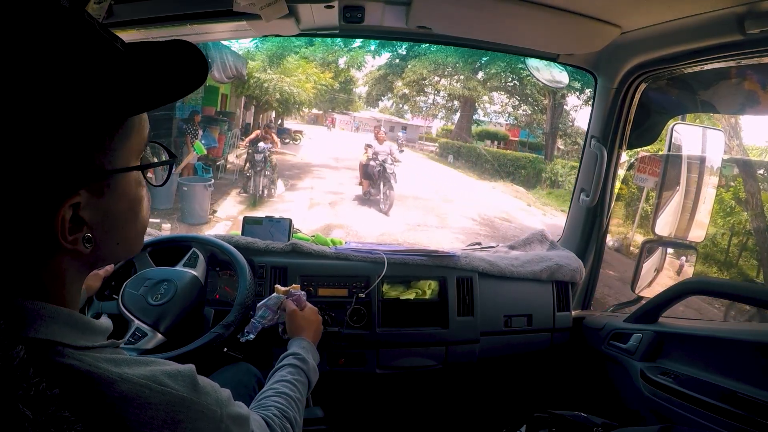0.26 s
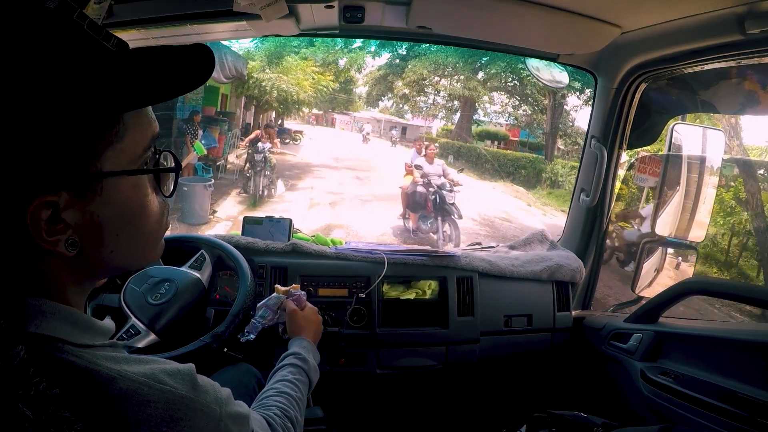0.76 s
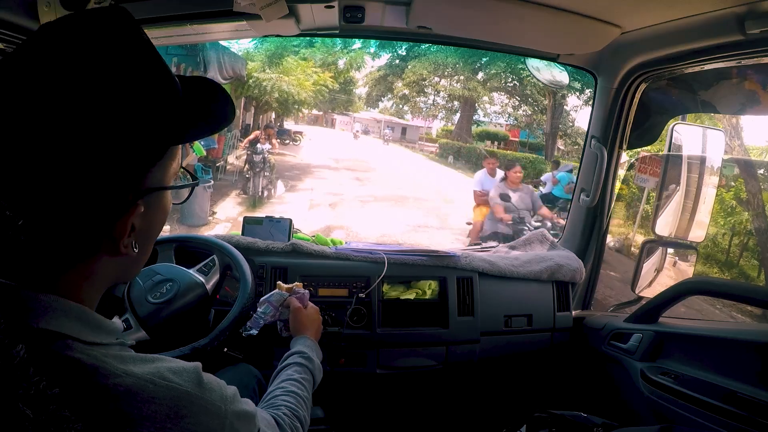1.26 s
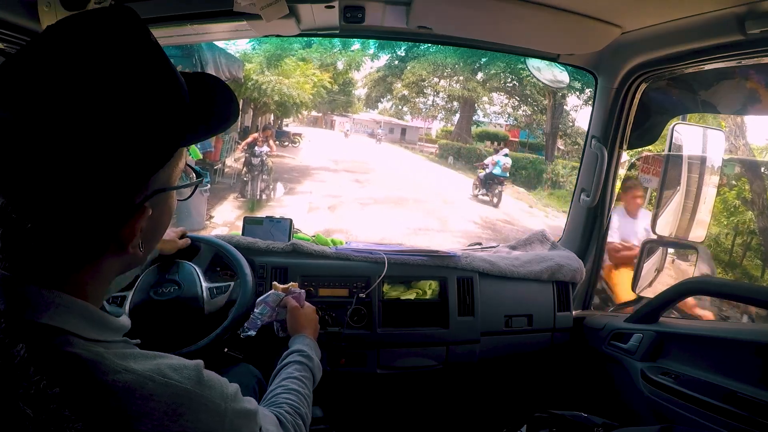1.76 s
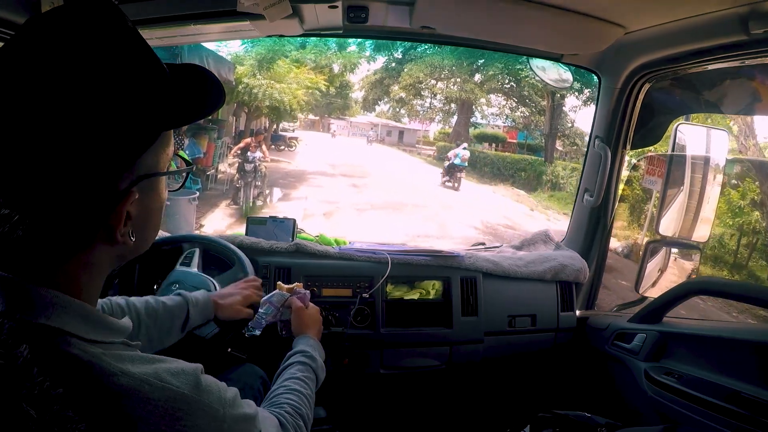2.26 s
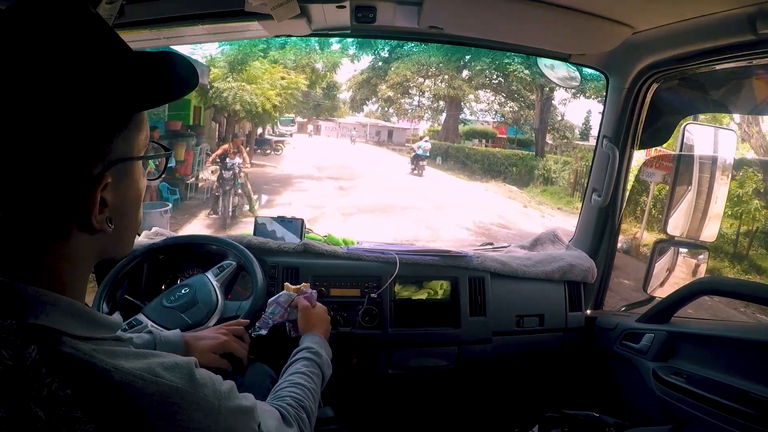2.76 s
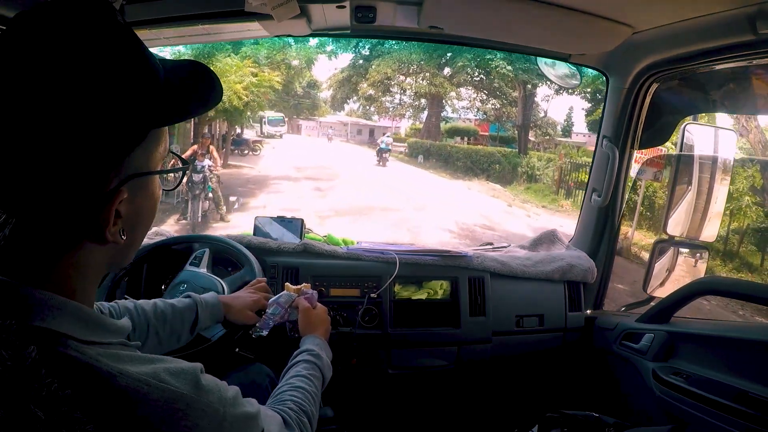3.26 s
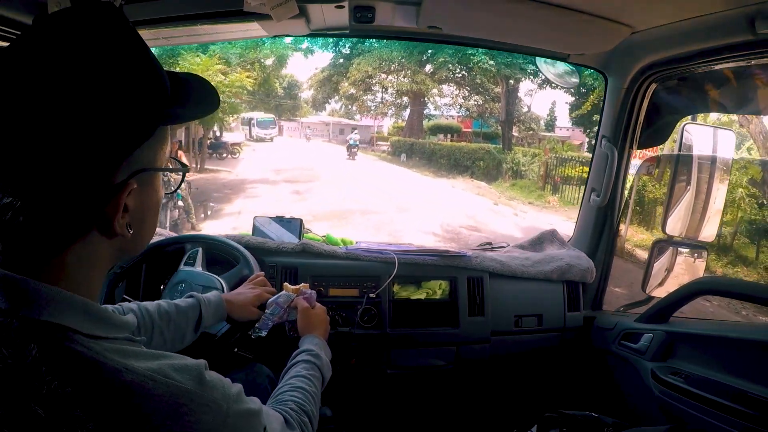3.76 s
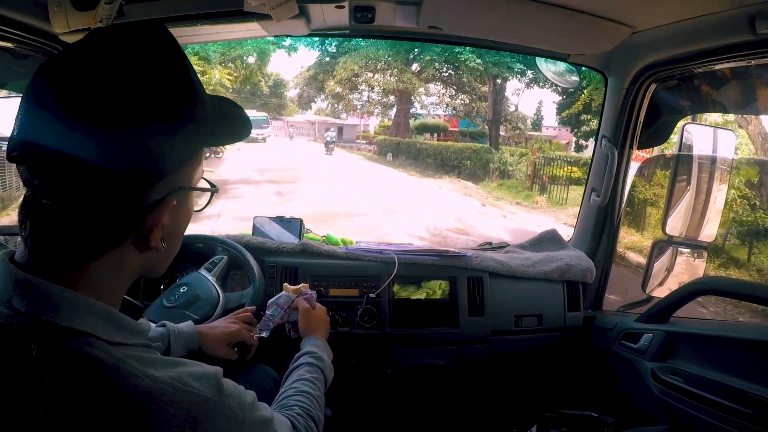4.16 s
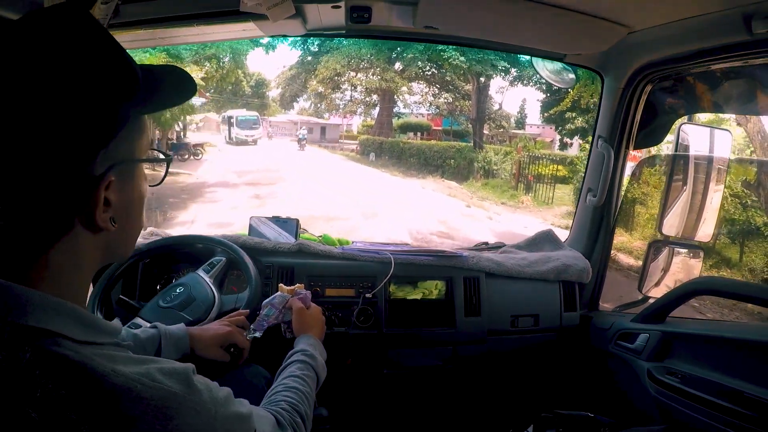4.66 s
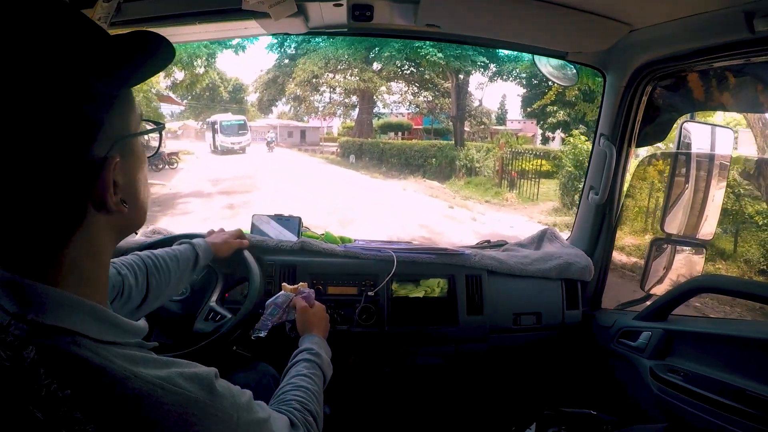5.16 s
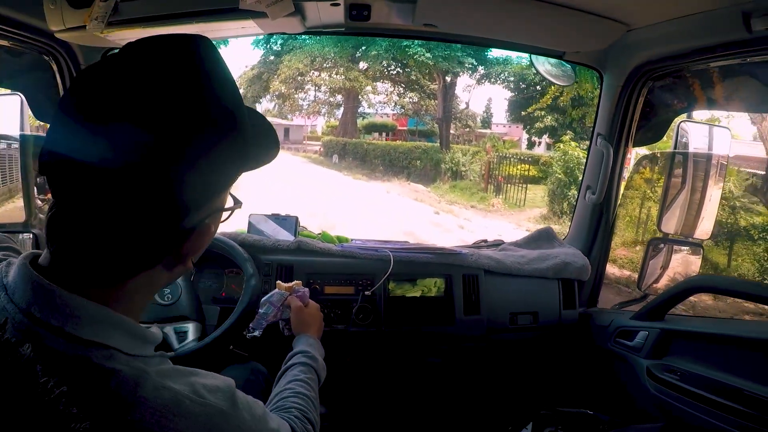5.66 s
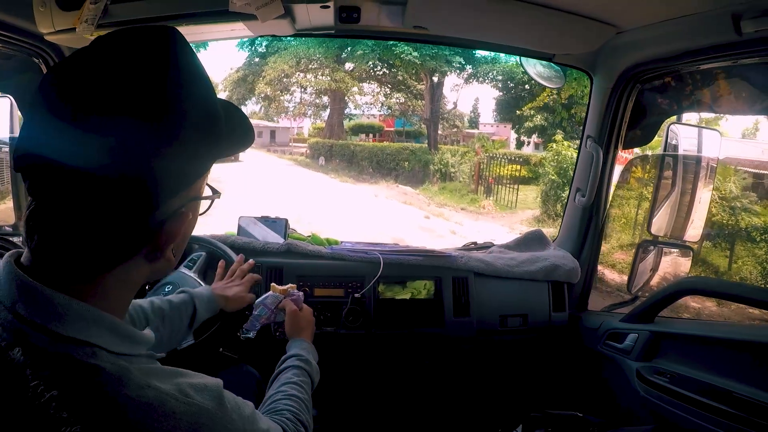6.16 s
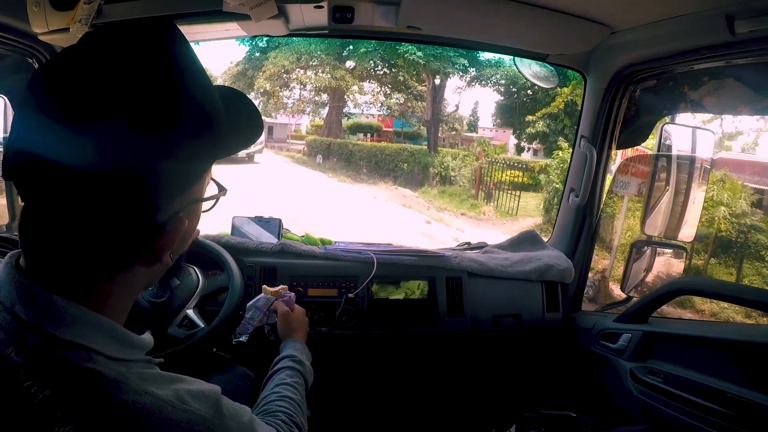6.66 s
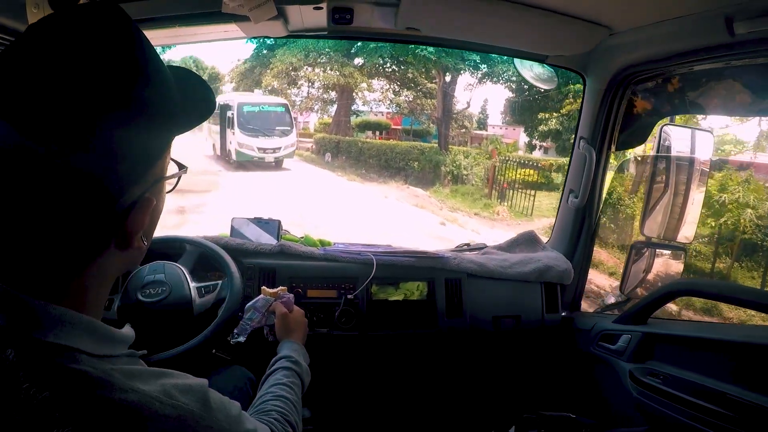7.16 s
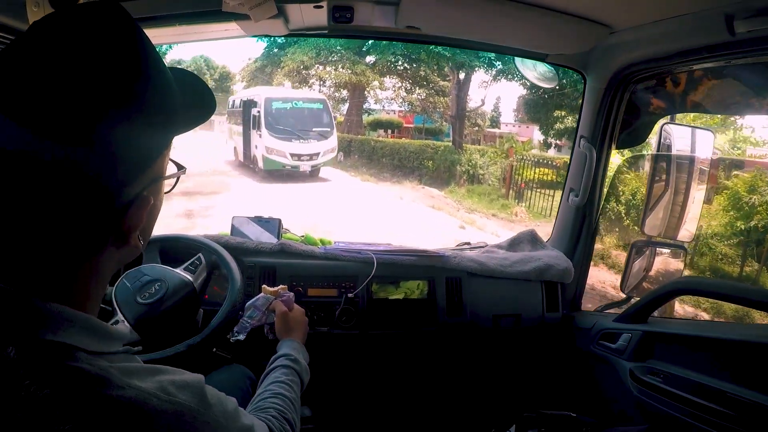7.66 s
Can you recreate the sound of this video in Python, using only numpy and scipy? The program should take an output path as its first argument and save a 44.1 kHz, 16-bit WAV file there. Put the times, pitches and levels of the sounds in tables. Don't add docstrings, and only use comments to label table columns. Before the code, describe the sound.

Inside a truck cab, a small diesel near idle booms and knocks, swelling with each pull, over deep body rumble, soft hiss and loose trim ticks.

```python
import sys
import numpy as np
from scipy import signal
from scipy.fft import rfft, irfft, next_fast_len
from scipy.io import wavfile

SR = 44100
rng = np.random.default_rng(int(sys.argv[2]) if len(sys.argv) > 2 else 0)


def master_out(mix):
    frames = np.transpose(np.atleast_2d(mix))
    ceiling = np.clip(frames, -1, 1)
    pcm = np.round(ceiling * 32767).astype(np.int16)
    wavfile.write(sys.argv[1], SR, pcm)


def convert_level_to_amplitude(level_db):
    exponent = np.asarray(level_db, float) / 20
    return 10 ** exponent


N = 349272


def rms_one(x):
    return x / np.sqrt(np.mean(x ** 2) + 1e-20)


def in_time(rows):
    seconds, *columns = np.transpose(rows)
    return [np.interp(np.arange(N) / SR, seconds, column) for column in columns]


def at_hz(points, hz):
    point_hz, point_db = np.transpose(points)
    return np.interp(np.log(hz), np.log(point_hz), point_db, left=-150, right=-150)


def drift(rate):
    r = np.exp(-80 * np.pi * rate / SR)
    white = rng.standard_normal(N // 40 + 2002)
    slow = signal.lfilter([1], [1, -2 * r, r * r], white)[2000:]
    return np.interp(np.arange(N) / 40, np.arange(len(slow)), rms_one(slow))


def ring(clicks, hz, t60):
    r = convert_level_to_amplitude(-60 / (t60 * SR))
    w = 2 * np.pi * hz / SR
    return signal.lfilter([0, np.sin(w)], [1, -2 * r * np.cos(w), r * r], clicks + 1e-18)


def coloured(white, spectrum):
    size = next_fast_len(N)
    hz = np.arange(1, size // 2 + 2) * SR / size
    return rms_one(irfft(rfft(white, size) * convert_level_to_amplitude(at_hz(spectrum, hz)), size)[:N])


def ports(alike, opposite):
    return np.array([alike + opposite, alike - opposite])


# frequency in Hz, tie from 0 to 1,
# phase lead in radians, opposed level of the engine orders in dB.
PORT_LINK = [(25, .9, -2.3, -11.5), (60, .8, -2.3, -11.5), (90, .65, -2.3, -1), (125, .6, -4.1, -6),
             (190, .4, -5.2, -8), (250, .7, -3.5, -6), (320, .15, -3.0, -6), (420, .5, -3.1, -6),
             (660, .55, -3.3, -3), (900, .4, -5.5, 0), (1250, .7, -6.8, 0), (1600, .6, -5.7, 0),
             (2000, .45, -6.5, 0), (2500, .1, -7.5, 0), (5000, .1, -7.8, 0), (9000, .35, -9.4, 0)]


def port_link(hz, column):
    table = np.array(PORT_LINK)
    return np.interp(np.log(hz), np.log(table[:, 0]), table[:, column])


def noise_bed(level_db, alike, opposite, opposite_db, flutter_db, rate):
    a, b = rng.standard_normal((2, N))
    hz = np.arange(1, N // 2 + 2) * SR / N
    tie = np.clip(port_link(hz, column=1), 0, 1)
    turned = tie * np.exp(1j * port_link(hz, column=2)) * rfft(a)
    follower = irfft(turned + np.sqrt(1 - tie ** 2) * rfft(b), N)
    gain = convert_level_to_amplitude(level_db + flutter_db * drift(rate))
    return gain * ports(coloured(a, alike), convert_level_to_amplitude(opposite_db) * coloured(follower, opposite))


# time in seconds, firings per second.
ENGINE_SPEED = [(0, 25), (.78, 25), (.95, 26.9), (1.15, 25.8), (1.4, 27.3), (2.05, 26.2), (2.3, 27),
                (2.55, 25.7), (3.8, 25.2), (4, 28.8), (4.5, 29.6), (4.8, 27.9), (5.25, 27.7), (5.5, 26.7),
                (6.45, 26.6), (6.63, 29.5), (7.7, 26.5), (7.92, 27.9)]


def firing_rate():
    hunting_hz = .15
    return in_time(ENGINE_SPEED)[0] + hunting_hz * drift(2.0)


# time in seconds, load in dB.
ENGINE_LOAD = [(0, -22), (.74, -6), (.92, 5), (1.17, -2.5), (1.35, 4), (2.3, 3), (2.55, 2), (2.82, 2.5),
               (3.02, -7), (3.55, 3), (3.78, -1.5), (4.7, 4), (5.3, -2), (6.35, 0.5), (6.6, 5.5), (6.95, 3),
               (7.5, -5), (7.92, 5.5)]


def engine_load():
    return in_time(ENGINE_LOAD)[0]


LOAD_SHARES = (0.034, 0.97, 0.22, 0.55, 0.12, 0.043)
# frequency in Hz, level in dB.
CAB_BOOM = [(60, -32), (76, -35), (88, -41), (111, -29), (135, -35), (165, -41), (190, -42.5), (228, -47.5),
            (241, -34), (252, -39), (264, -46), (285, -66.5), (330, -72.5)]


def boom(firing, load_db):
    turn, at = 2 * np.pi * np.cumsum(firing) / SR, np.arange(N)
    first_db = -21.5 + LOAD_SHARES[0] * load_db + 2.2 * drift(3.9)
    second_db = -20 + LOAD_SHARES[1] * load_db + 2.6 * drift(5.0)
    own_db = {1: first_db, 2: second_db}
    out = 0
    for order in range(1, 12):
        hz = order * firing[::50]
        cab_db = at_hz(CAB_BOOM, np.clip(hz, 64, 310))
        cab = cab_db, convert_level_to_amplitude(port_link(hz, column=3)), port_link(hz, column=2)
        passed_db, opposed, lead = (np.interp(at, at[::50], column) for column in cab)
        level_db = own_db.get(order, passed_db + LOAD_SHARES[2] * load_db) + 1.5 * drift(3.7)
        angle = order * turn + 0.19 * drift(6.7) + rng.uniform(0, 6.9)
        out = out + np.sqrt(2) * convert_level_to_amplitude(level_db) * ports(np.sin(angle), opposed * np.sin(angle + lead))
    return out


# share of the firing period from 0 to 1, level in dB.
KNOCKS = [
    (.0, -11),
    (0.272, 10.5),
    (0.398, -0.5),
    (0.658, -23),
]
# frequency in Hz, level in dB, t60 in seconds,
# share heard in phase at both ports.
BULKHEAD = [(855, -8, .18, .6), (1226, 4, .26, .3), (1725, -17, .1, .5), (1895, -15, .06, .5),
            (1985, -14, .06, .6), (1040, -8, .05, .3), (1100, -8, .06, .3), (1165, -10, .06, .3),
            (1325, -7, .04, .15), (3360, -20, .04, .9)]


def knock(cycle, load_db):
    knock_db = -46.5 + LOAD_SHARES[3] * load_db + 0.5 * drift(8.1)
    firing_number = cycle.astype(int)
    cylinder_db = np.array([-7.0, -3.0, -13.5, -5.0])
    strength_db = cylinder_db[firing_number % 4] + 0.43 * rng.standard_normal(400)[firing_number]
    gate = sum(convert_level_to_amplitude(db) * np.exp(-((cycle - share) % 1) / 0.13) for share, db in KNOCKS)
    push = gate * convert_level_to_amplitude(strength_db) + 0.26
    out = 0
    for hz, db, t60, share in BULKHEAD:
        repeated = rng.standard_normal(1650)[(cycle % 1 * 1650).astype(int)]
        force = 2.6 * repeated + 0.21 * rng.standard_normal(N)
        mode = convert_level_to_amplitude(db) * rms_one(ring(push * force, hz, t60))
        out = out + ports(np.clip(share, 0, 1) * mode, mode)
    return convert_level_to_amplitude(knock_db - 1.0) * out


# frequency in Hz, level in dB.
GEAR_COVER = [(1080, -16), (1165, -13), (1195, -10), (1226, 0), (1255, -8), (1280, -19), (1340, -8),
              (1420, -18)]


def whine(cycle, load_db):
    whine_db = -46 + LOAD_SHARES[4] * load_db + 0.5 * drift(2.2)
    teeth = 46
    turn = 2 * np.pi * cycle
    tooth_load = np.exp(2.2 * np.cos(turn - 1.9))
    song = np.sin(teeth * turn + .3 * drift(4.0))
    tone = rms_one(tooth_load * song) * convert_level_to_amplitude(1.2 * drift(10.0))
    size = next_fast_len(N)
    hz = np.clip(np.arange(size // 2 + 1) * SR / size, 1081, 1419)
    covered = irfft(rfft(tone, size) * convert_level_to_amplitude(at_hz(GEAR_COVER, hz)), size)[:N]
    tone = convert_level_to_amplitude(whine_db + 13.0) * covered
    return ports(0.26 * tone, tone)


# time in seconds, road roughness in dB, outside noise let in in dB.
STREET = [(0.0, 1.5, 6.5), (0.7, -1.5, 7), (1.2, -0.5, 4), (1.7, -1.5, 3.5), (2.45, 0.5, 3.5),
          (2.9, -2.5, -0.5), (3.7, -1, 1), (4.1, 0.5, 2.5), (4.45, 2, -0.5), (4.8, -2.5, -2),
          (5.6, -0.5, -1), (6.3, -2, 0.5), (6.6, 1.5, 2), (7.35, -2.5, -1.5), (7.7, 0.5, -0.5),
          (7.92, 4.5, 5)]


def street():
    return in_time(STREET)


# frequency in Hz, level in dB per Hz.
RUMBLE = [(8, -58.5), (14, -4), (22, -2), (31, 0.5), (38, 3), (44, -4.5), (58, -3.5), (72, -4), (95, -13.5),
          (135, -15), (170, -11.5), (205, -16.5), (226, -34), (250, -21), (307, -34), (420, -56.5),
          (600, -79)]
RUMBLE_OPPOSED = [(7.1, -38), (12, -9), (38, 0), (99, 5), (157, -10.5), (250, -14), (269, -18), (298, -35),
                  (420, -20), (550, -56), (920, -120)]


def road_rumble(rough_db):
    return noise_bed(-17.5 + rough_db, RUMBLE, RUMBLE_OPPOSED, opposite_db=-7.5, flutter_db=0.64, rate=6.6)


# frequency in Hz, level in dB per Hz.
DRONE = [(180, -38), (300, -12), (329, -3), (566, -8), (638, -14), (766, -8.5), (840, -3), (991, -5),
         (1210, -3.5), (1390, -14), (1960, -7.5), (2130, -14.5), (2700, -20), (3510, -52), (5940, -120)]
DRONE_OPPOSED = [(180, -42), (300, -21), (422, -32), (752, -13.5), (930, -27), (1100, -1), (1220, -4),
                 (1340, -7), (1460, -17.5), (2150, -16), (2510, -38), (2700, -26.5), (3510, -59)]


def body_drone(outside_db, load_db):
    drone_db = -44 + 0.54 * outside_db + LOAD_SHARES[5] * load_db
    return noise_bed(drone_db, DRONE, DRONE_OPPOSED, opposite_db=8.5, flutter_db=1.23, rate=36.0)


# frequency in Hz, level in dB per Hz.
HISS = [(1290, -2), (2200, -4.5), (2880, -1), (3300, 2), (3830, -4), (4570, -5), (6170, -2), (7190, 0),
        (8200, -5.5), (9200, -12.5), (10500, -15), (11300, -20), (12300, -20.5), (13500, -24),
        (15500, -57.5)]
HISS_OPPOSED = [(1290, -26), (2230, -7.5), (2400, -14), (3080, -22), (3520, -16.5), (4200, -24),
                (5080, -17), (5510, -18), (7580, -14), (9000, -21.5), (10500, -23.5), (11300, -28),
                (13500, -35), (15500, -55)]


def tyres_and_vents(outside_db):
    pass_s, pass_length_s, pass_peak_db = 0.46, 0.11, 6
    pass_db = pass_peak_db * np.exp(-((np.arange(N) / SR - pass_s) / pass_length_s) ** 2)
    hiss = noise_bed(0, HISS, HISS_OPPOSED, opposite_db=-2.0, flutter_db=1.22, rate=64.0)
    tyres = signal.sosfiltfilt(signal.butter(2, 4600, fs=SR, output="sos"), hiss)
    vents = hiss - tyres
    return convert_level_to_amplitude(-49.5 + 0.84 * outside_db) * tyres + convert_level_to_amplitude(-50.5 + 0.85 * outside_db + pass_db) * vents


# start in seconds, peak in dB, body in dB against the peak,
# clip in dB against the peak, t60 in seconds.
TICKS = [(0.0014, -36, 15, 1, 0.037), (0.058, -22.5, -0.5, 4.5, 0.037), (0.062, -27.5, -1, 3, 0.074),
         (0.5707, -24, -18, 2.5, 0.038), (0.9148, -32, -11, -1, 0.082), (1.6594, -30, -4, -9, 0.056),
         (1.7897, -9.5, -23, -2, 0.034), (1.8005, -27, -29, -9, 0.045), (2.168, -15, -33, -2.5, 0.054),
         (2.3986, -31, -16, -8, 0.06), (2.835, -34.5, -16, -10, 0.15), (3.1358, -32.5, 3, -6, 0.071),
         (3.4096, -41, 14, -3, 0.064), (3.4163, -32, 4, 0.5, 0.15), (3.612, -26.5, -9, -3, 0.097),
         (3.764, -32, -20, -11, 0.047), (3.8796, -30.5, -14, -1, 0.059), (4.414, -31.5, 13, -6, 0.08),
         (4.418, -33, 18, -5, 0.08), (4.426, -36, 13, 4, 0.095), (4.451, -39.5, 17, 3, 0.18),
         (4.6213, -31, 0, -7, 0.045), (4.6465, -37, 4, -7, 0.035), (5.1923, -47, -12, -2, .04),
         (5.2174, -29.5, -10, 8, 0.052), (5.2215, -23, -17, 0.5, 0.073), (5.2324, -24, -11, 2, 0.059),
         (5.241, -30, 1, -5, 0.062), (5.2612, -30, 2, 5, 0.11), (5.281, -33, -2, 1, 0.058),
         (5.3, -39, 1, -1, 0.063), (5.321, -44, 0, 5, .06), (5.3964, -34.5, -8, -5, 0.076),
         (6.6684, -35, -2, -13, 0.053), (7.199, -27.5, -22, -22, 0.03)]
# frequency in Hz, level in dB per Hz.
TICK_EDGE = [(3600, -34), (4600, -3.5), (5400, -3), (6370, 0), (7620, 2), (9000, -8.5), (10500, -18.5),
             (12500, -26.5), (14500, -45)]
TICK_BODY = [(200, -26), (330, -5), (415, 2), (520, -7), (625, -2), (700, -9), (880, 6.5), (1000, -9),
             (1130, -4.5), (1250, -17), (1500, -36)]
TICK_PANEL = [(1350, -27), (1540, -3), (1650, 6), (1900, -15), (2300, -1.5), (2800, -5.5), (3400, -38.5)]
TICK_CLIP = [(2000, -43), (2600, -12.5), (3100, -2), (3480, 4), (3850, -2), (4400, -4), (5200, -30)]


def ticks():
    t, shapes = np.arange(SR // 2) / SR, np.zeros((4, N + SR))
    for s, peak_db, body_db, clip_db, t60 in TICKS:
        swell_s = 0.0013 + 0.033 * t60
        panel_db = -2.5 + 0.21 * body_db
        at = max(round((s - 1.13 * swell_s) * SR), 0)
        swell = (1 - np.exp(-t / max(swell_s, 1e-4))) ** 2
        shape = swell * convert_level_to_amplitude(peak_db - 60 * t / max(t60, .01))
        shapes[:, at:at + len(t)] += shape * convert_level_to_amplitude(np.array([[0], [body_db], [panel_db], [clip_db]]))
    # spectrum, level in dB, opposed level in dB
    parts = [(TICK_EDGE, -5.5, -1.5), (TICK_BODY, -14.0, 3.0), (TICK_PANEL, -8.0, 2.5), (TICK_CLIP, -9.0, -1.5)]
    grain = convert_level_to_amplitude(1.5 * drift(230.0))
    out = 0
    for shape, (spectrum, db, opposite_db) in zip(shapes, parts):
        a, b = rng.standard_normal((2, N))
        noise = ports(coloured(a, spectrum), convert_level_to_amplitude(opposite_db) * coloured(b, spectrum))
        out = out + shape[:N] * grain * convert_level_to_amplitude(db) * noise
    return out


# frequency in Hz, level in dB, t60 in seconds.
TRIM_MODES = [(365, -1.5, 0.062), (424, -3.5, .05), (527, -9.5, 0.054), (630, -12, .05), (748, -5, .06),
              (890, -2.5, .07), (990, -4.5, .06), (1095, -3, .08)]


def trim_body():
    s, peak_db, body_db = np.transpose(TICKS)[:3]
    chance_db = 2 * rng.standard_normal((len(s), len(TRIM_MODES)))
    padding = signal.butter(4, 1250, fs=SR, output="sos")
    out = 0
    for k, (hz, level_db, t60) in enumerate(TRIM_MODES):
        blows = np.zeros(N)
        blows[(s * SR).astype(int)] = convert_level_to_amplitude(peak_db + body_db + level_db - 11.5 + chance_db[:, k])
        mode = ring(signal.sosfilt(padding, blows + 1e-18), hz, np.clip(t60, .02, .2))
        opposed_db = 8 * np.log2(hz / 600)
        out = out + ports(mode, -convert_level_to_amplitude(opposed_db) * mode)
    return out


# time in seconds, peak in dB.
BUMPS = [(2.613, -19), (2.72, -23), (3.408, -19), (3.428, -9.5), (3.459, -14.5), (3.603, -15.5),
         (3.622, -9.5), (3.842, -22), (4.268, -20), (4.41, -14), (4.421, -13), (4.432, -15), (4.468, -17),
         (4.483, -10), (6.613, -20.5), (6.871, -19.5), (7.54, -20.5), (7.724, -21), (7.835, -27)]
# frequency in Hz, level in dB, t60 in seconds.
FLOOR_PAN = [(138.7, 1, 0.16), (164.5, 5, 0.19), (190, -14, 0.17), (214, -27, 0.057), (363, -3.5, 0.029)]


def bumps():
    s, peak_db = np.transpose(BUMPS)
    at = np.round(s * SR).astype(int)
    chance_db = 1.2 * rng.standard_normal((len(BUMPS), len(FLOOR_PAN)))
    out = 0
    for k, (hz, level_db, t60) in enumerate(FLOOR_PAN):
        blows = np.zeros(N)
        blows[at] = convert_level_to_amplitude(peak_db + level_db - 5.5 + chance_db[:, k])
        out = out + ring(blows, hz, t60)
    out = signal.sosfilt(signal.butter(4, 300, fs=SR, output="sos"), out)
    return ports(out, -.3 * out)


# start in seconds, length in seconds, pitch in Hz, level in dB.
SQUEAKS = [
    (7.051, .08, 10270, -67),
    (7.365, .1, 10050, -66),
    (7.5, 0.12, 10350, -65),
    (7.703, 0.18, 10140, -67),
    (7.822, 0.028, 5580, -47.5),
    (7.856, 0.026, 5560, -49),
    (7.895, 0.022, 5050, -55),
]


def squeaks():
    t, white = np.arange(N) / SR, rng.standard_normal(N)
    out = 0
    for s, length, hz, db in SQUEAKS:
        swell = np.sin(np.pi * np.clip((t - s) / length, 0, 1)) ** 2
        out = out + convert_level_to_amplitude(db) * swell * rms_one(ring(ring(white, hz, .012), hz, .012))
    return ports(out, -.4 * out)


def scene():
    firing, load_db = firing_rate(), engine_load()
    rough_db, outside_db = street()
    cycle = np.cumsum(firing) / SR + .3
    engine = boom(firing, load_db) + knock(cycle, load_db) + whine(cycle, load_db)
    beds = road_rumble(rough_db) + body_drone(outside_db, load_db) + tyres_and_vents(outside_db)
    return engine + beds + ticks() + trim_body() + bumps() + squeaks()


def top_cut(x):
    return signal.sosfilt(signal.butter(12, 14550, fs=SR, output="sos"), x)


def record(dry):
    mix = signal.sosfilt(signal.butter(2, 18, "high", fs=SR, output="sos"), dry)
    mix = 0.98 * np.tanh(mix / 0.89)
    mix = mix * np.minimum(1, np.arange(N)[::-1] / (.006 * SR))
    return top_cut(mix)


dry = scene()
out = record(dry)
master_out(out)
```